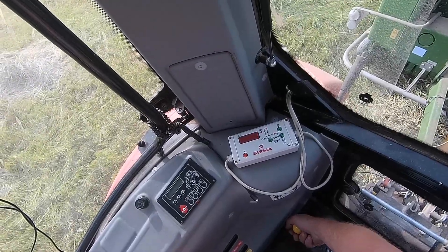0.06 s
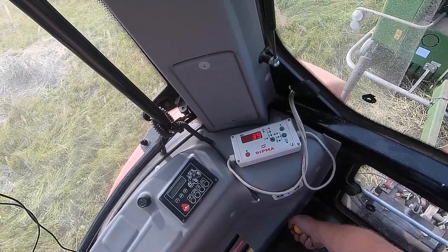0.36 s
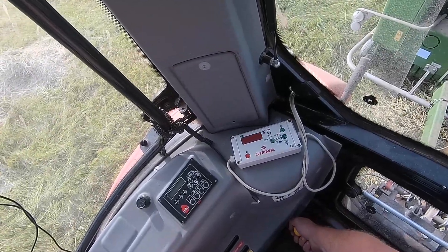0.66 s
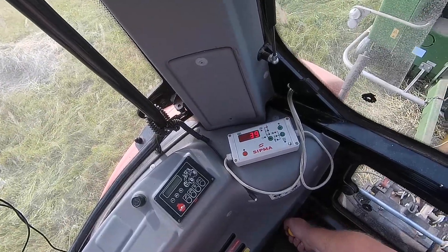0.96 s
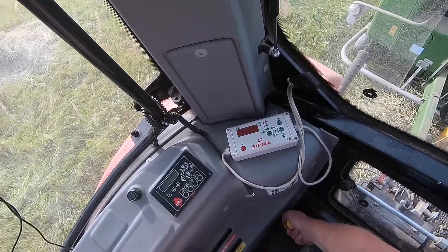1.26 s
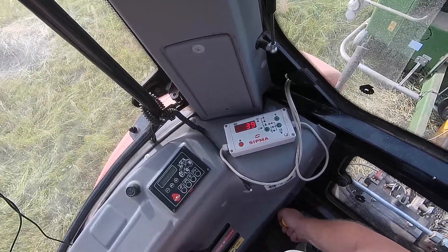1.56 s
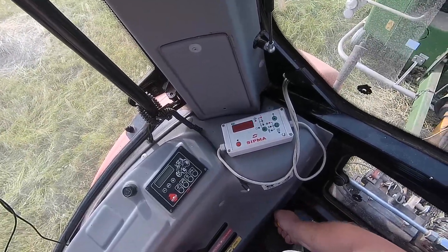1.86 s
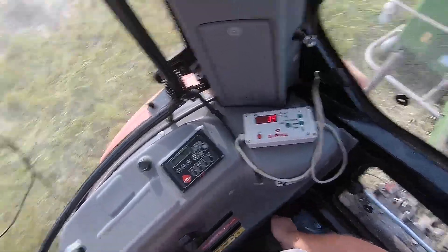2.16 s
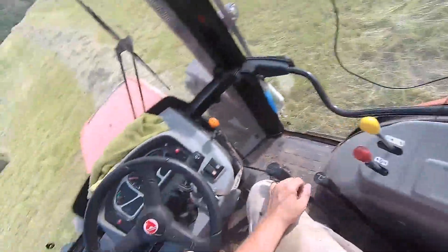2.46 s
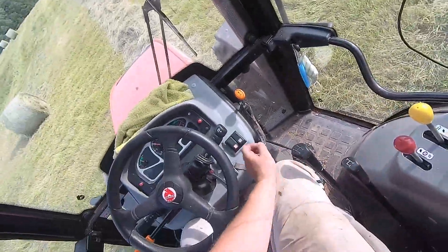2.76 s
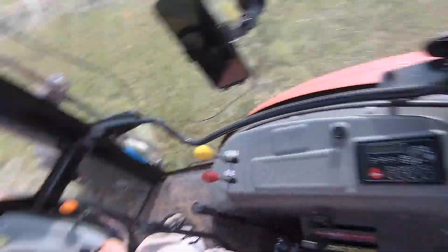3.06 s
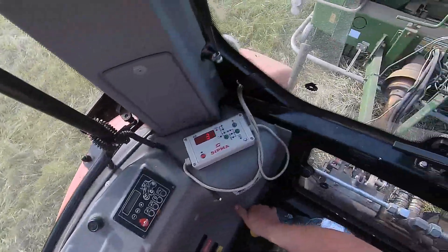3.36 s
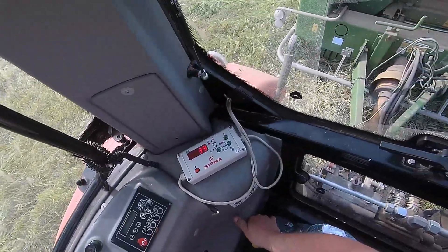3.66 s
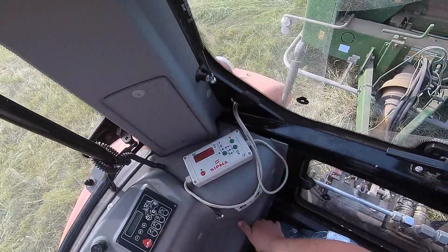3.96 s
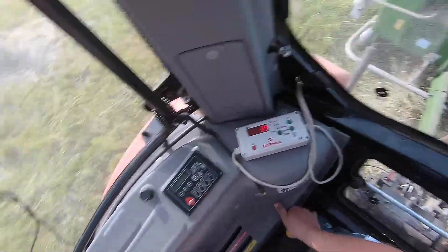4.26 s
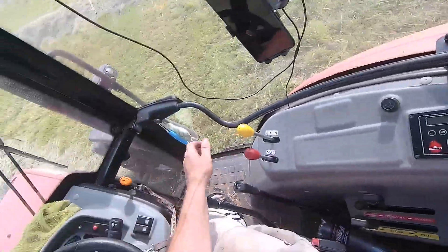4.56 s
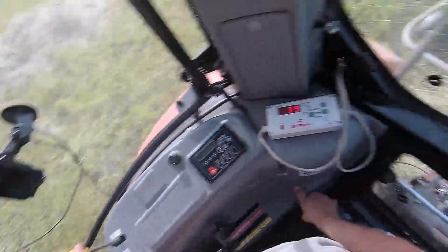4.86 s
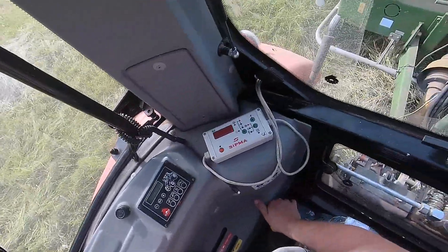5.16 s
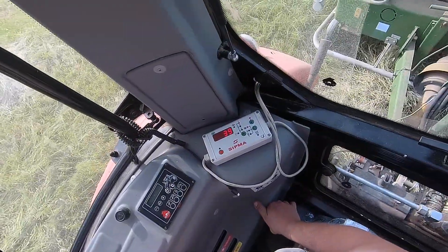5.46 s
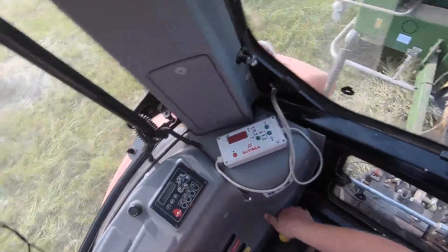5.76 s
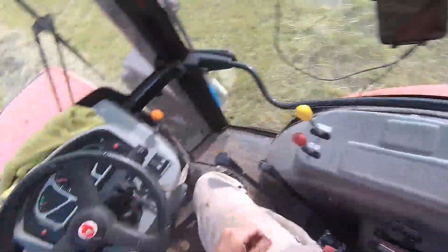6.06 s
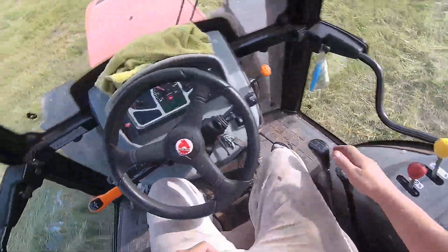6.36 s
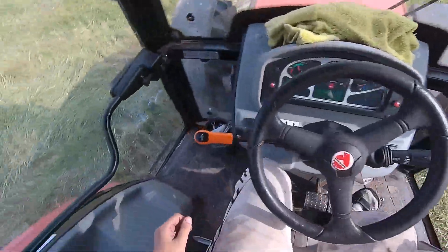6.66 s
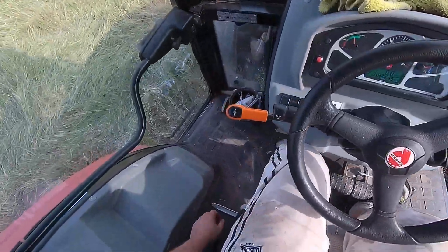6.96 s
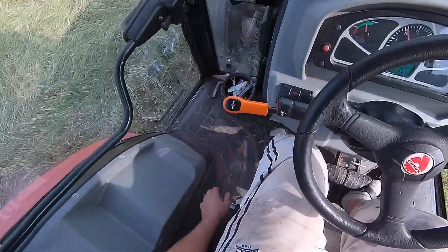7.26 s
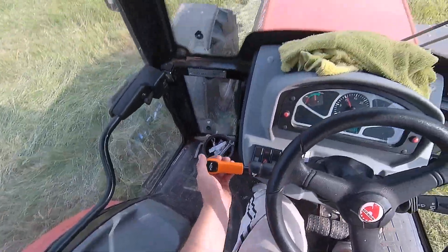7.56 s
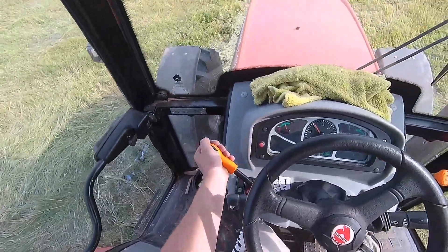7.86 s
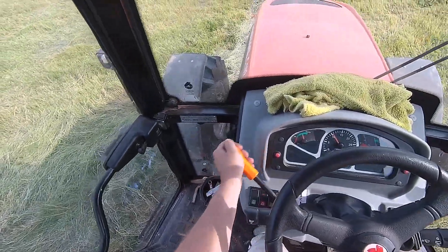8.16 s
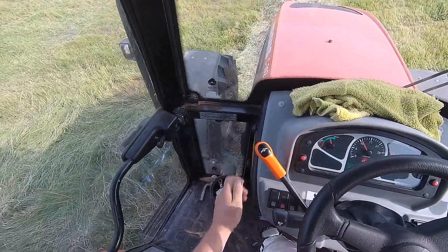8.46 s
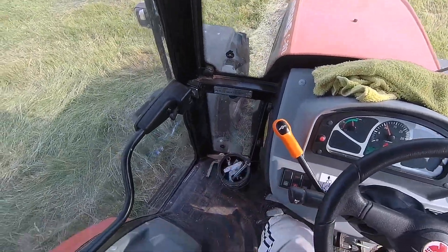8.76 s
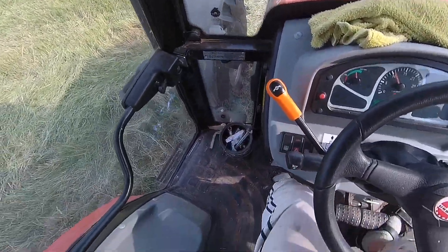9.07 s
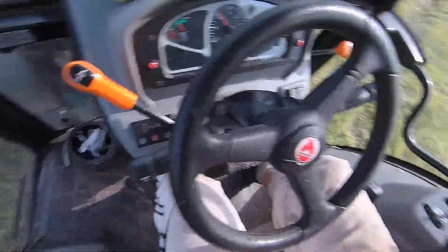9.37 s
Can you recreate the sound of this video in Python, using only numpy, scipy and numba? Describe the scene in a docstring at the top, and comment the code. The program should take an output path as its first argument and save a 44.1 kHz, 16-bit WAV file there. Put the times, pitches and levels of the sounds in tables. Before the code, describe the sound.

A tractor towing a baler runs steadily, heard close up from the driver's seat. Two hard hydraulic judders come early, followed by a cluster of dull microphone bumps. Control levers clack at irregular moments, and the engine dips under load around the middle. The bass thins out twice and creeps back. In the second half come a high handbrake squeak, a small ping, soft brushing and further lever knocks.

```python
"""A diesel drones and clatters, heard inside the cab of a slow tractor with a round baler behind it.
Pump, gears and electrics whine over it. Sticking hydraulics shake the panels in two hard judders,
levers clack, the microphone is jostled, an arm brushes the controls, and the handbrake squeaks and
drops with a ping. The bass starts thin, then thins twice more as a low-cut jumps up and creeps back."""
import sys
import numpy as np
from scipy import signal
from scipy.fft import rfft, irfft, next_fast_len
from scipy.io import wavfile
from numba import njit

SR = 44100
rng = np.random.default_rng(int(sys.argv[2]) if len(sys.argv) > 2 else 0)


def put_to_file(sound):
    """Save the sound as 16-bit audio at rate SR, in the file named by the first command-line argument."""
    columns = np.atleast_2d(sound).T  # one column per channel
    safe = np.clip(columns, -1, 1)
    whole_steps = np.round(safe * 32767)
    wavfile.write(sys.argv[1], SR, whole_steps.astype(np.int16))


N = 424241
TIME = np.arange(N) / SR
PUMP_ORDER, GEAR_ORDER = 10, 50  # multiples of the firing rate

# cab panel resonances: f/Hz, width/Hz, gain/dB
PANEL_MODES = [(288, 30, 12.5), (408, 39, 6.5), (535, 22, 5), (686, 20, 5), (763, 17, 4), (925, 35, 2.5),
               (1230, 40, 1.5), (1394, 25, 5.5), (1680, 114, 8.5), (2166, 44, 8.5), (2930, 74, 2.5),
               (3580, 70, -17), (4740, 640, 3.5), (10060, 360, 4)]
# upward jumps of the low-cut: t/s, rise/s, length/s, corner/Hz
LOW_CUT_JUMPS = [(-.1, 0.018, 0.13, 244), (3.61, 0.3, 0.82, 495), (6.09, 0.0037, .8, 1086)]


def amp(db):
    """Decibels to gain."""
    return 10 ** (np.asarray(db) / 20)


def unit(x):
    """Scales to rms 1."""
    return x / np.sqrt(np.mean(x ** 2) + 1e-20)


def curve(points):
    """Breakpoints joined by straight lines in time."""
    return np.interp(TIME, *np.transpose(points))


def spectrum(points, hz):
    """Breakpoints joined on a log-frequency axis."""
    f, value = np.transpose(points)
    return np.interp(np.log(hz + 1), np.log(f), value)


def peaks(modes, hz):
    """Gain of a set of resonances: f/Hz, width/Hz, gain/dB."""
    return 1 + sum((amp(db) - 1) / (1 + (2 * (hz - f) / width) ** 2) for f, width, db in modes)


def envelope(start, rise, length, t60):
    """Rises in a straight line, holds until start + length, then dies away."""
    t = TIME - start
    return np.clip(t / rise, 0, 1) * amp(-60 * np.maximum(t - length, 0) / t60)


def add(mix, s, sound):
    """Mixes a stereo sound in at time s."""
    part = mix[:, round(s * SR):][:, :sound.shape[1]]
    part += sound[:, :part.shape[1]]


def wander(rate_hz):
    """Random drift of rms 1, mostly slower than rate_hz."""
    hz = np.fft.rfftfreq(N, 1 / SR)
    return unit(irfft(rfft(rng.standard_normal(N)) / (1 + (hz / rate_hz) ** 4), N))


def tone(cycles):
    """A sine of rms 1 with a random starting phase."""
    return np.sqrt(2) * np.sin(2 * np.pi * (cycles + rng.random()))


def noise(gain, size=N, gate=1):
    """Gated stereo noise of rms 1, coloured by gain(hz): bass centred, treble diffuse."""
    # likeness of left and right in the cab: f/Hz, correlation
    likeness = [(30, 1), (300, 1), (700, 0.99), (1200, 0.98), (2200, 0.65), (4000, 0.19), (9000, -0.28),
                (15000, 0.27)]
    length = next_fast_len(size)
    hz = np.fft.rfftfreq(length, 1 / SR)
    mid, side = rfft(rng.standard_normal((2, size)) * gate, length)
    same = spectrum(likeness, hz)
    mid, side = mid * np.sqrt(1 + same), side * np.sqrt(1 - same)
    return unit(irfft(np.array([mid + side, mid - side]) * gain(hz), length)[:, :size])


def engine_drone(firings, waver=0.15):
    """Low engine orders hum; the higher ones waver more as the cab rocks."""
    # partials of the drone: multiple of the firing rate, level/dB
    orders = [(1, -45), (2, -56.5), (3, -69), (3.5, -51), (4, -61.5), (5, -61.5), (5.5, -56), (7, -61.5),
              (8, -61.5)]
    drone = np.zeros(N)
    for order, db in orders:
        partial = tone(order * (firings + 0.019 * wander(8.3)))
        drone += amp(db) * partial * (1 + waver * np.sqrt(order) * wander(3.2))
    return drone


def cab_boom(firings, in_gear_s=8.1, rise_s=0.9, level_db=-48.5):
    """Once in gear, the cab booms roughly on the fourth order."""
    swell = np.clip((TIME - in_gear_s) / rise_s, 0, 1)
    return amp(level_db) * swell * tone(4 * firings + 0.24 * wander(6.4)) * (1 + 0.66 * wander(18))


def pump_whine(firings, pump_hz, level_db=-55.5, unload_s=6.26, t60=2.4):
    """The hydraulic pump whines until it is unloaded, loudest near one cab resonance."""
    load = amp(level_db - 60 * np.maximum(TIME - unload_s, 0) / t60)
    resonance = peaks([(338.3, 18, 7.55)], pump_hz)
    return load * resonance * tone(PUMP_ORDER * firings) * (1 + 0.31 * wander(7.5))


def gear_whine(firings, floor_db=-67):
    """Meshing teeth sing, swelling twice out of the clatter."""
    # swells of the whine: t/s, rise/s, level/dB, t60/s
    swells = [(1.2, .9, -62.5, 12.4), (7.45, 0.27, -60, 2.2)]
    level = amp(floor_db) + sum(amp(db) * envelope(s, rise, rise, t60) for s, rise, db, t60 in swells)
    return level * tone(GEAR_ORDER * firings + 0.068 * wander(13)) * (1 + 0.2 * wander(11))


def diesel_clatter(firings, knock_depth=0.13, uneven=0.28, gain_db=2, flutter_db=0.5):
    """Noise pulses at each firing; each of the four cylinders knocks a little differently."""
    # colour of the clatter: f/Hz, relative density/dB
    colour = [(29, -44), (50, -14), (85, -11.5), (184, -5), (313, -13), (353, -8.5), (428, -10),
              (927, -13.5), (1620, -19), (1740, -21), (2560, -29), (2810, -28), (8750, -48.5),
              (14900, -60.5), (16000, -55)]
    # cab air resonances: f/Hz, width/Hz, gain/dB
    air_modes = [(120, 24, 6.5), (179, 5.9, 2.5), (273, 41, 3.5), (527, 21, 1.5), (676, 12, 3.5),
                 (952, 99, 5.5), (1068, 27, 5), (1175, 52, 5.5)]
    # how hard the engine works: t/s, relative level/dB
    effort = [(0, -46.5), (2.5, -45.5), (5.9, -46), (6.5, -47), (7.8, -45), (9.62, -44)]
    strength = 1 + uneven * rng.standard_normal(4)
    knock = 1 + 2 * knock_depth * strength[firings.astype(int) % 4] * np.exp(-(firings % 1) / 2)
    clatter = noise(lambda hz: amp(spectrum(colour, hz)) * peaks(air_modes, hz), gate=knock)
    return clatter * amp(curve(effort) + gain_db + flutter_db * wander(7.4))


def engine(speed_drift=0.00305):
    """One shaft drives drone, boom, pump, gears and clatter, so they all sag together under load."""
    # engine speed as the pitch of the pump: t/s, f/Hz
    speed = [(0, 352.7), (3.6, 353), (3.76, 331.3), (4.0, 343), (5.2, 341), (5.5, 307.5), (5.7, 315.5),
             (5.88, 335.5), (6.08, 339.7), (6.4, 348), (9.62, 347)]
    pump_hz = curve(speed)
    firings = np.cumsum(pump_hz / PUMP_ORDER * (1 + speed_drift * wander(5.4))) / SR
    hum = engine_drone(firings) + cab_boom(firings)
    return hum + pump_whine(firings, pump_hz) + gear_whine(firings) + diesel_clatter(firings)


def electrics():
    """Thin, steady whines of the cab's electrics."""
    # whines: f/Hz, level/dB
    whines = [(7607, -84.5), (15219, -89)]
    return sum(amp(db) * tone(hz * TIME) for hz, db in whines)


def hydraulic_judder(rasp_db=-20.5, rasp_growth=1.23, bite=0.21, shudder_db=-39.5, shudder_top_hz=420):
    """Hydraulics stick and slip: each slip rasps, and a panel booms when a slip harmonic meets it."""
    # two hard and two weak judders: t/s, rise/s, length/s, relative level/dB, t60/s
    judders = [(0.954, 0.041, 0.21, 0.5, 0.35), (1.304, 0.12, 0.36, -18.5, 0.43),
               (1.531, 0.045, 0.22, .5, 0.39), (2.054, .016, 0.03, -12, 0.16)]
    # stick-slip rate, slowing overall: t/s, f/Hz
    slip_rate = [(.97, 134), (1.02, 104), (1.045, 85), (1.09, 90), (1.122, 82.5), (1.145, 88.5),
                 (1.3, 93.6), (1.35, 82), (1.48, 83), (1.54, 96), (1.6, 84), (1.68, 69), (1.72, 66),
                 (1.77, 55.3), (1.87, 36), (2.02, 35.3), (2.08, 53), (2.14, 46)]
    # response of the cab air and one booming panel: f/Hz, width/Hz, gain/dB
    shaken_modes = [(41.5, 15, 12.5), (89.6, 14, -18), (116, 25, 11), (183, 31, 13), (265.5, 20, 25)]
    # colour of the rasp: f/Hz, relative density/dB
    colour = [(190, -17), (320, -6), (389, -1), (423, -7.5), (549, -8), (668, -6.5), (897, -6),
              (1040, -10.5), (1240, -7.5), (1440, -18), (1700, -18), (2360, -22.5), (9950, -39),
              (16000, -56)]
    slip_hz = curve(slip_rate)
    slips = np.cumsum(slip_hz * (1 + 0.014 * wander(44))) / SR
    force, sway, shudder = np.zeros((3, N))
    late_s, hang_s = 0.0052, 0.038  # the cab shakes just before the rasp and hangs on after it
    for s, rise, length, db, t60 in judders:
        force += amp(rasp_growth * db) * envelope(s + late_s, rise, length - late_s, t60)
        sway += amp(db) * envelope(s, rise, length + hang_s, 1.234 * t60)
    for k in range(1, 8 + 1):
        response = peaks(shaken_modes, k * slip_hz) / (1 + (k * slip_hz / shudder_top_hz) ** 4)
        shudder += response * tone(k * slips) * (1 + 0.18 * wander(43))
    pulses = (1 + 2 * bite * np.exp(-(slips % 1) / 0.28)) * amp(1.1 * wander(79))
    rasp = noise(lambda hz: amp(spectrum(colour, hz)) * peaks(PANEL_MODES, hz), gate=pulses)
    return amp(rasp_db) * force * rasp + amp(shudder_db) * sway * shudder


def lever_clacks(t60=0.2, ring_width_hz=65, panel_limit_hz=2000):
    """A lever hits its stop: click and knock come first, the cab's thud swells later and lasts longer."""
    # lever and valve hits, levels relative: t/s, thud/dB, knock/dB, click/dB, ring/Hz, ring/dB, rise/s
    hits = [(1.008, -31.5, -27, -32.5, 890, -6, 0.0011), (2.149, -53, -58, -56, 404, -9, .004),
            (3.289, -43, -61, -67, 180.6, 7, .005), (3.521, -35.5, -31, -38.5, 4700, 14, 0.0016),
            (5.094, -34, -30.5, -35, 2300, 16, 0.0071), (5.222, -31.5, -41, -62, 180, 8, 0.0068),
            (5.693, -37, -43, -58, 931, 4, .004), (6.165, -29, -31.5, -56, 470, 21, 0.0018),
            (6.188, -29, -39.5, -53, 412, 10, .004), (6.763, -43, -39, -42, 1860, 13, 0.0015),
            (6.876, -65, -41.5, -36, 2980, 5, 0.0011), (7.878, -63, -38.5, -47, 1010, 12, .002),
            (8.132, -63, -40.5, -56.5, 790, 12, .003), (8.232, -43.5, -39.5, -51, 215, 9, 0.0031),
            (8.344, -34.5, -35.5, -52.5, 366, 20, 0.0039), (8.409, -46, -41.5, -51, 691, 0, 0.0019),
            (9.080, -54, -32.5, -55, 771, 13, .002), (9.122, -47, -37, -47, 5000, 13, .002),
            (9.481, -33, -26.5, -45, 525, 14, 0.0027)]
    # colour of a hit: f/Hz, relative density/dB
    colour = [(60, 4), (170, 6), (300, -3), (600, -2), (1200, -5.5), (2500, -15), (4500, -18.5),
              (7000, -26), (10000, -27.5), (13000, -33), (16000, -30)]
    out, t = np.zeros((2, N)), np.arange(SR // 2) / SR
    # a blow stirs only the lower panel resonances, plus a ring of its own
    low_modes = [(f, width, db / (1 + (f / panel_limit_hz) ** 4)) for f, width, db in PANEL_MODES]
    for s, thud_db, knock_db, click_db, ring_hz, ring_db, rise in hits:
        body = low_modes + [(ring_hz, ring_width_hz, ring_db)]
        thud = (90, 420, thud_db + 5.5, 3 * rise, 1.03 * t60)
        knock = (446, 1620, knock_db + 1.5, rise, t60)
        click = (1940, 15000, click_db + 2.5, rise, 0.83 * t60)
        for low_hz, high_hz, db, attack_s, band_t60 in (thud, knock, click):
            band = noise(lambda hz: amp(spectrum(colour, hz)) * peaks(body, hz)
                         / (1 + (low_hz / (hz + 1)) ** 6 + (hz / high_hz) ** 6), size=len(t))
            add(out, s, band * (1 - np.exp(-t / attack_s)) * amp(db - 60 * t / band_t60))
    return out


def microphone_bumps(from_s=2.6, to_s=2.98, weak_count=10, t60=0.037, rumble_t60=0.31):
    """The microphone is jostled on its mount: short, dull pushes run together in a low rumble."""
    # the hardest bumps: t/s, relative level/dB, low-pass corner/Hz
    hard = [(2.565, -22, 352), (2.578, -22, 650), (2.61, -22, 400), (2.68, -21, 750), (2.695, -21.5, 900),
            (2.787, -24, 448), (2.808, -25, 850), (2.884, -26.5, 550), (2.909, -20, 372), (2.94, -27, 450),
            (3.235, -29.5, 250)]
    # colour of a bump: f/Hz, relative density/dB
    colour = [(30, -14), (70, 1), (200, 1.5), (1000, -3.5), (16000, -33)]
    out, t = np.zeros((2, N)), np.arange(SR // 4) / SR
    times = from_s + (to_s - from_s) * (np.arange(weak_count) + rng.random(weak_count)) / weak_count
    weak = [(s, rng.normal(-29, 3), 400) for s in times]
    attack = 1 - np.exp(-t / 0.0013)
    fade = amp(-0.5 - 60 * t / t60) + amp(-11.5 - 60 * t / rumble_t60)
    for s, db, corner_hz in hard + weak:
        push = noise(lambda hz: amp(spectrum(colour, hz)) / (1 + (hz / corner_hz) ** 3), size=len(t))
        add(out, s, amp(db) * push * attack * fade)
    return out


def sleeve_rustle(grain_db=1.5, t60=0.21):
    """An arm brushes along the controls in grainy strokes, each swelling to its end."""
    # strokes: t/s, length/s, level/dB
    strokes = [(3.757, 0.18, -57), (4.088, .015, -55), (6.0, .012, -52.5), (6.382, .03, -48),
               (6.53, 0.022, -54.5), (7.02, 0.034, -53.5), (7.63, .22, -47.5), (7.933, 0.021, -51.5),
               (8.228, 0.0606, -48), (8.33, .07, -51), (9.5, .1, -57)]
    # colour of the cloth: f/Hz, relative density/dB
    colour = [(300, -3), (1500, 7), (3500, -1.5), (7000, -10), (11000, -17.5), (16000, -23)]
    pressure = sum(amp(db) * envelope(s, length, length, t60) for s, length, db in strokes)
    return noise(lambda hz: amp(spectrum(colour, hz))) * pressure * amp(grain_db * wander(70))


def low_cut_pop(level_db=-35, attack_s=0.00041, decay_s=0.21):
    """A soft, very low pop at the last, sudden jump of the low-cut."""
    t = np.maximum(TIME - LOW_CUT_JUMPS[-1][0], 0)
    return amp(level_db) * (1 - np.exp(-t / attack_s)) * np.exp(-t / decay_s)


def pivot_squeaks(jitter_hz=78.5, grip_db=4, gain_db=-2.5, pan_db=2.5, echo_db=-2, echo_t60=0.16):
    """Dry pivots sing on the right, rough while they barely grip, purer when loud; the cab echoes them."""
    # gliding squeaks: t/s, rise/s, length/s, from/Hz, to/Hz, relative level/dB, t60/s
    squeaks = [(6.403, 0.07, .1, 7930, 9650, -52, .12), (6.513, .02, 0.18, 14060, 13990, -37.5, 0.24),
               (9.438, 0.0082, 0.0602, 4180, 4370, -58.5, 0.12)]
    direct = np.zeros((2, N))
    for s, rise, length, from_hz, to_hz, db, t60 in squeaks:
        grip = amp(db + grip_db * wander(37)) * envelope(s, rise, length, t60)
        glide_hz = np.interp(TIME, [s, s + length], [from_hz, to_hz])
        roughness = 1 / (0.5 + grip / amp(-32))
        cycles = np.cumsum(glide_hz + jitter_hz * roughness * wander(287)) / SR
        direct += amp(gain_db) * grip * tone(np.array([cycles, cycles + 0.17]))  # the right ear leads
    t = np.arange(SR // 4) / SR
    cab = rng.standard_normal((2, len(t))) * amp(-60 * t / echo_t60)
    echoes = signal.oaconvolve(direct, cab / np.linalg.norm(cab[0]), axes=1)[:, :N]
    return (direct + amp(echo_db) * echoes) * amp([[-pan_db], [pan_db]])


def handbrake_spring(release_s=6.755, attack_s=0.0082, t60=0.2):
    """The handbrake's spring pings as the pawl lets go."""
    # modes of the spring: f/Hz, level/dB
    modes = [(7150, -46.5), (8340, -51), (9500, -57), (11900, -48), (13200, -56), (14200, -55)]
    t = np.maximum(TIME - release_s, 0)
    ring = np.array([sum(amp(db) * tone(hz * t) for hz, db in modes) for ear in range(2)])
    return ring * (1 - np.exp(-t / attack_s)) * amp(-60 * t / t60)


@njit
def low_cut(x, corner_hz):
    """Two-pole high-pass whose corner moves."""
    y, low, band = np.zeros(len(x)), 0., 0.
    for i in range(len(x)):
        g = np.tan(np.pi * corner_hz[i] / SR)
        y[i] = (x[i] - (np.sqrt(2) + g) * band - low) / (1 + g * (np.sqrt(2) + g))
        low += 2 * g * (band + g * y[i])
        band += 2 * g * y[i]
    return y


def scene():
    """The running machine, with the handling noises in the cab on top."""
    machine = engine() + electrics() + hydraulic_judder()
    return (machine + lever_clacks() + microphone_bumps() + sleeve_rustle()
            + pivot_squeaks() + handbrake_spring())


def record(dry, rest_hz=39, octaves_per_s=1.66, ceiling=0.36, top_hz=16300):
    """The microphone's low-cut jumps and glides back; peaks saturate softly and the top is cut off."""
    glide_t60 = np.log2(1000) / octaves_per_s
    jumps = [hz * envelope(s, rise, length, glide_t60) for s, rise, length, hz in LOW_CUT_JUMPS]
    corner_hz = np.maximum(np.max(jumps, axis=0), rest_hz)
    thinned = np.array([low_cut(channel, corner_hz) for channel in dry]) + low_cut_pop()
    rounded = ceiling * np.tanh(thinned / ceiling)
    low_pass = signal.firwin(511, top_hz, window=("kaiser", 9), fs=SR)
    return signal.oaconvolve(rounded, low_pass[None], "same")


dry = scene()
out = record(dry)
put_to_file(out)
```